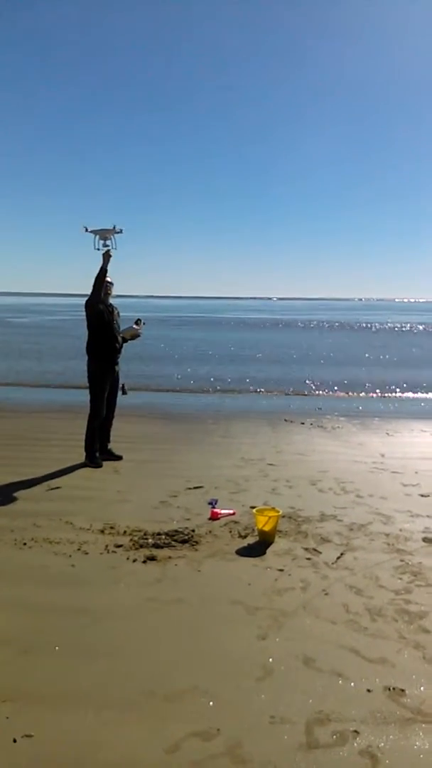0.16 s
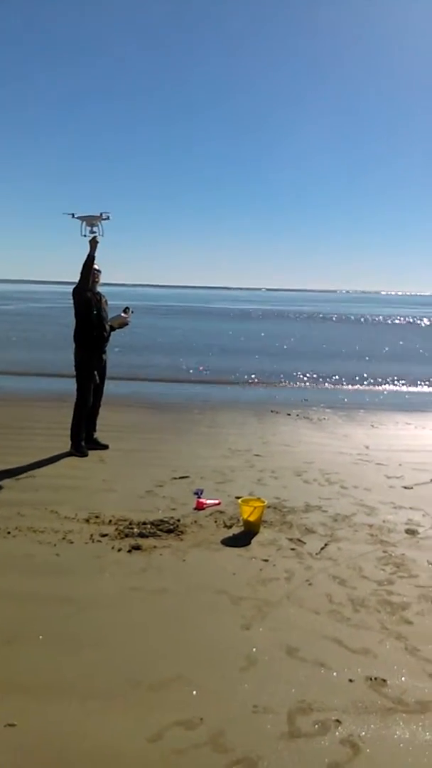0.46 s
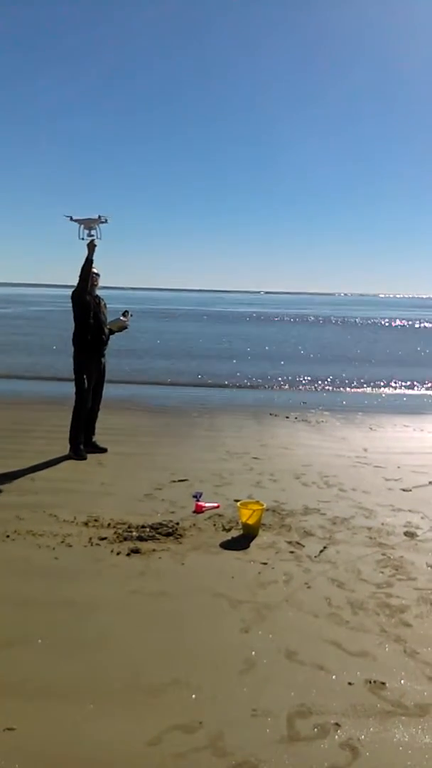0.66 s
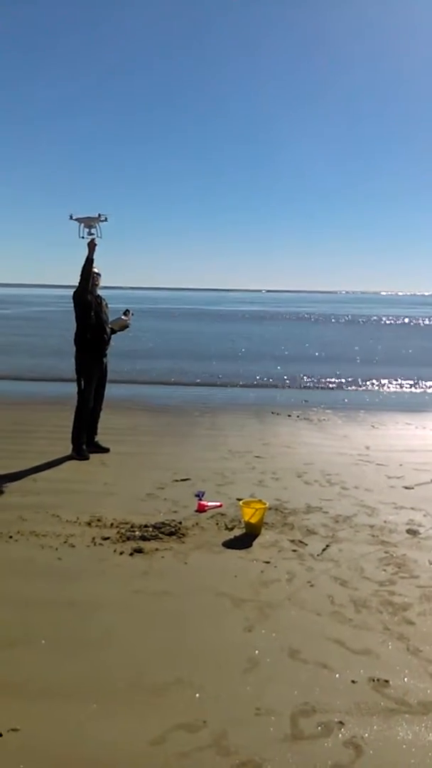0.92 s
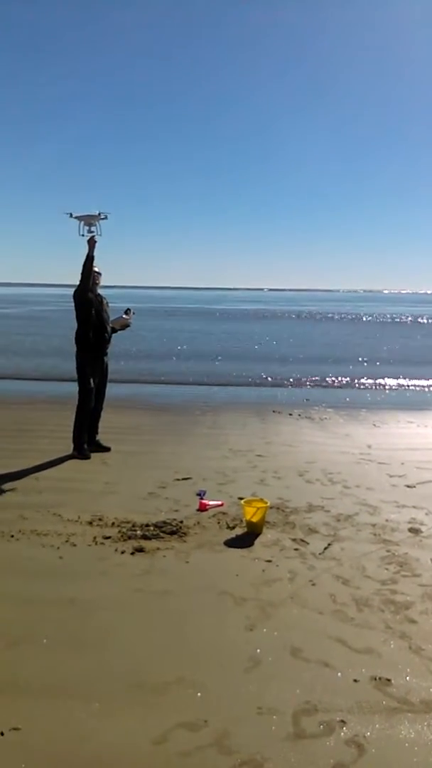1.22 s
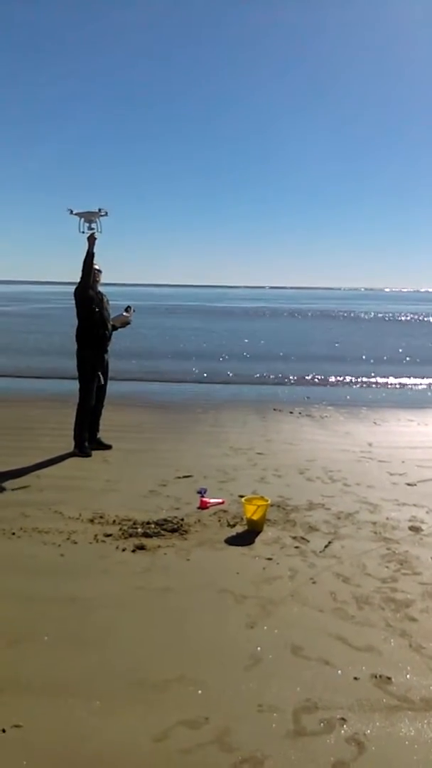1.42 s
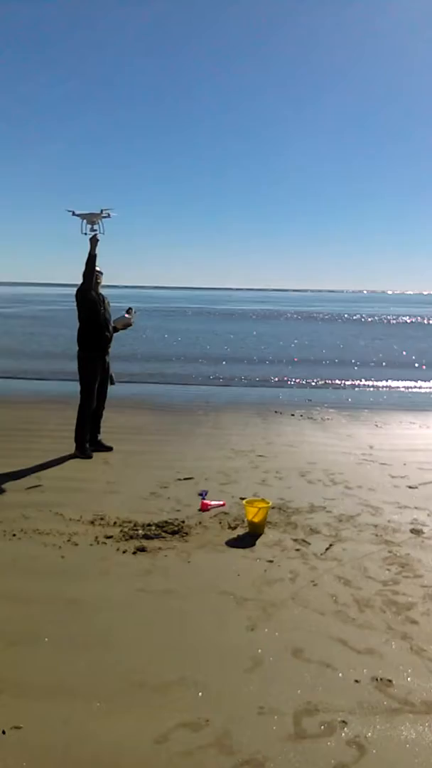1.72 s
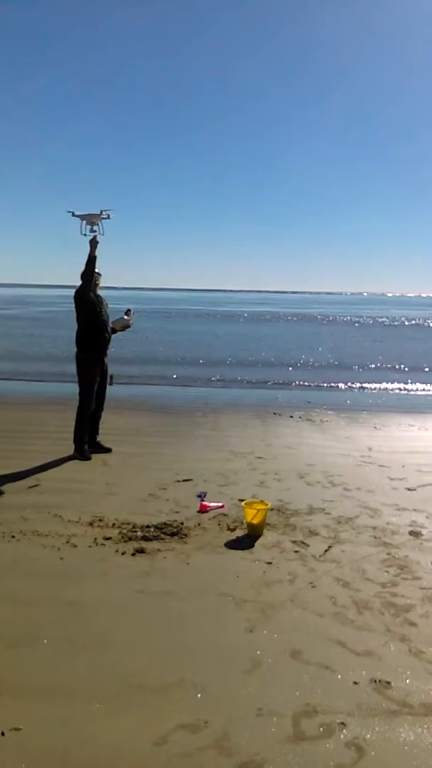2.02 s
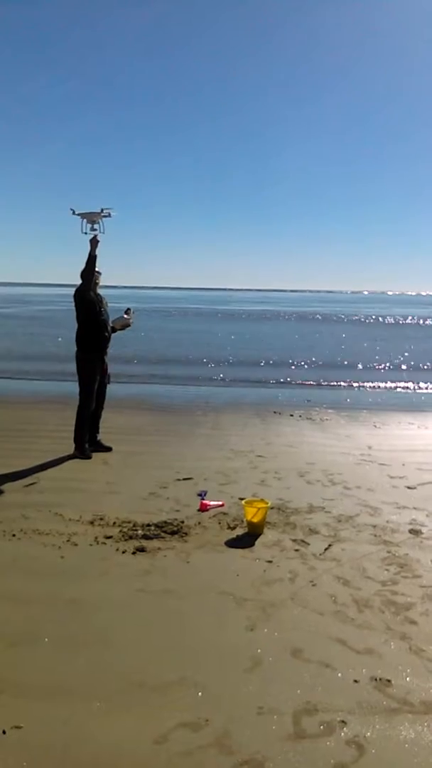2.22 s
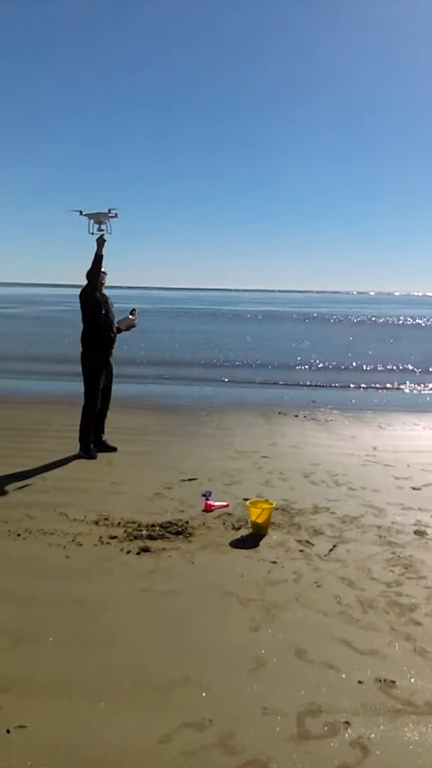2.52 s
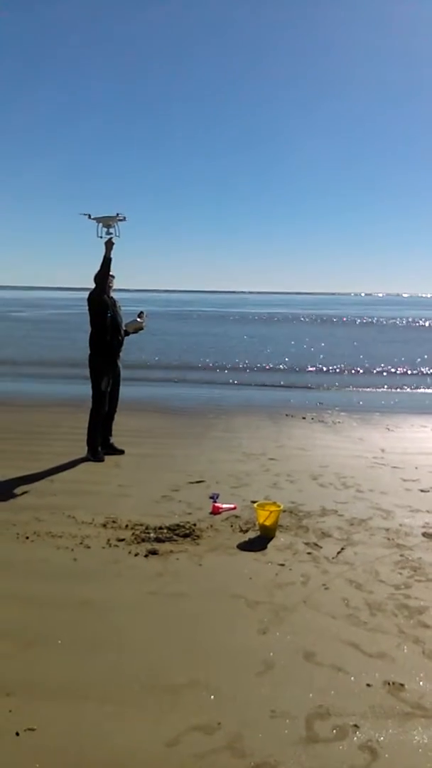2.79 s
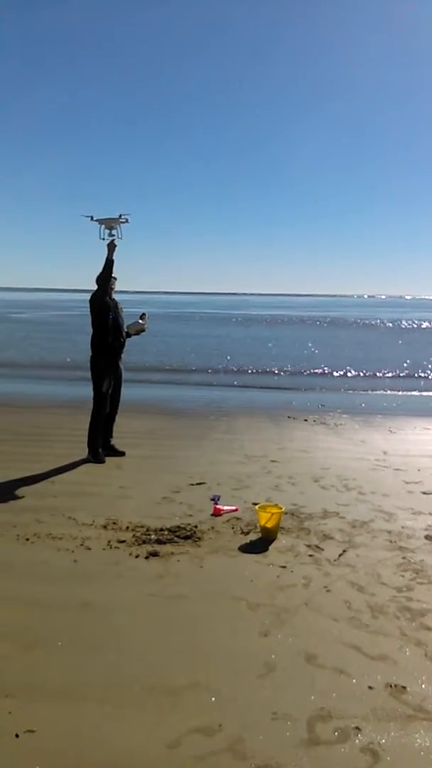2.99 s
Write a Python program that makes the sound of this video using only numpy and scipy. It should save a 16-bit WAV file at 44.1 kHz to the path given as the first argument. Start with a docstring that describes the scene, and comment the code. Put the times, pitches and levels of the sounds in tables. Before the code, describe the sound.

A small drone hovers a few metres away throughout, with a buzzing propeller hum and thin motor whine over a soft sea murmur. Wind rumbles and thumps on the left of the microphone from the start. Near 1.7 seconds it drops and the buzz wavers harder. Two buffets hit the right at 2.0 and 2.2 seconds, and wind is back on the left until about 3 seconds.

```python
"""On a beach, a small four-rotor drone hovers some metres from a stereo microphone. From the start each
rotor hums at its own blade rate, the motors whine and the blades hiss over the murmur of the sea, while
wind rumbles and thumps in the left port. Near 1.7 s the wind drops and the rotors waver harder as the
drone corrects. Two buffets hit the right port at 2.0 and 2.2 s; the wind is back on the left until 3 s."""
import sys
import numpy as np
from scipy import signal
from scipy.fft import rfft, irfft, next_fast_len
from scipy.io import wavfile
from scipy.ndimage import uniform_filter1d, map_coordinates

SR = 44100
rng = np.random.default_rng(int(sys.argv[2]) if len(sys.argv) > 2 else 0)


def wav_out(sig):
    """Save sig, one row per channel (or a flat mono array), as 16-bit PCM at SR to the path in sys.argv[1]."""
    wavfile.write(sys.argv[1], SR, np.round(np.clip(np.atleast_2d(sig).T, -1, 1) * 32767).astype(np.int16))


N = 138915


def amp(db):
    """Decibels to gain."""
    return 10 ** (np.asarray(db) / 20)


def unit(x):
    """Scale to rms 1."""
    return x / np.sqrt(np.mean(x ** 2) + 1e-20)


def along(points, hz):
    """Each value column of (frequency, value, ..) rows, interpolated at hz on a log axis."""
    freqs, *columns = np.transpose(points)
    return np.array([np.interp(np.log(hz + 1), np.log(freqs + 1), c) for c in columns])


def curves(rows):
    """Each value column of (time, value, ..) rows, interpolated at every sample."""
    times, *columns = np.transpose(rows)
    return [np.interp(np.arange(N) / SR, times, c) for c in columns]


def wobble(rate):
    """A smooth random curve with `rate` knots a second."""
    return map_coordinates(rng.standard_normal(int(N * rate / SR) + 4), [np.arange(N) * rate / SR])


def filtered(x, response):
    """Pass x through a complex response, given as a function of frequency."""
    size = next_fast_len(N + SR // 2)
    return irfft(rfft(x, size) * response(np.fft.rfftfreq(size, 1 / SR)), size)[..., :N]


def port_phase(hz):
    """Phase difference between the two microphone ports, half on each side."""
    # lead of the left port: (frequency [Hz], phase [rad])
    lead = [(0, 0), (1380, 0.7), (4130, 2), (4480, 1.07), (9820, -38), (10900, -38.5), (13100, -45.5),
            (15200, -65.5)]
    return np.exp(.5j * np.outer([1, -1], np.interp(hz, *np.transpose(lead))))


def sea_and_blade_hiss(level_db, patchy_db):
    """Sea and blades make a broad noise in faint patches, partly shared by the two ports."""
    # relative spectrum: (frequency [Hz], left [dB], right [dB])
    spectrum = [(25, -21, 1.5), (81, -9, -4), (185, -12, -9.5), (580, -14, -51), (1020, -15, -10),
                (1500, -16, -22), (2310, -15.5, -14.5), (3740, -22.5, -21.5), (4380, -22, -26.5),
                (6050, -13.5, -15), (5670, -23.5, -23.5), (7770, -18.5, -20.5), (8900, -21.5, -14.5),
                (11000, -25, -13), (12330, -26, -18.5), (15900, -36, -33)]
    # likeness of left and right: (frequency [Hz], shared power [0..1])
    likeness = [(300, 0.57), (1500, 0.56), (8000, 0.67), (13000, 0.17)]
    bins = signal.stft(rng.standard_normal((3, N)), nperseg=512)[2]
    patches = uniform_filter1d(rng.standard_normal(bins.shape[1:]), size=4, axis=0)
    patches = unit(uniform_filter1d(patches, size=8, axis=1))
    common, *own = signal.istft(bins * amp(patchy_db * patches), nperseg=512)[1][:, :N]
    share = lambda f: np.clip(along(likeness, f), 0, 1)
    both = filtered(common, lambda f: amp(along(spectrum, f)) * port_phase(f) * np.sqrt(share(f)))
    each = filtered(np.array(own), lambda f: amp(along(spectrum, f)) * np.sqrt(1 - share(f)))
    return amp(level_db) * unit(both + each)


def wind_rumble(flutter_db, flutter_growth, lumpy_db):
    """Turbulence rumbles in the left port; a flutter rides on its swings, growing faster than the wind."""
    # wind on the left port: (time [s], level [dB])
    wind = [(0, -30.5), (.25, -27), (.5, -25), (1, -25.5), (1.45, -27), (1.58, -32.5), (1.68, -41.5),
            (1.95, -41), (2.1, -28.5), (2.25, -30.5), (2.3, -21.5), (2.5, -27), (2.95, -28), (3.15, -38)]
    # relative spectra of rumble and flutter: (frequency [Hz], level [dB])
    rumble_spectrum = [(20, 0), (45, 4), (100, 2.5), (170, -8), (300, -22), (600, -58)]
    flutter_spectrum = [(60, -25), (200, 3.5), (350, -4), (600, -14.5), (1500, -43)]
    wind_db, = curves(wind)
    noise = lambda shape: unit(filtered(rng.standard_normal(N), lambda f: amp(along(shape, f)[0])))
    rumble = unit(amp(lumpy_db * wobble(24.32)) * noise(rumble_spectrum))
    swings = uniform_filter1d(abs(rumble), size=200)
    flutter = unit(swings * noise(flutter_spectrum))
    flutter *= amp(flutter_db + flutter_growth * (wind_db - wind_db.max()))
    return amp(wind_db) * (rumble + flutter) * [[1], [0]]


def wind_thumps(swing_cycles, suck_cycles, hard_db):
    """Each eddy is a short swing on one port; the hardest are a sudden suck, rebounding ever slower."""
    # eddies, a list for the left port and one for the right: (time [s], peak [dB], pitch [Hz])
    eddies = [
        [(0.115, -15.4, 146), (0.277, -20, 121), (0.326, -12.5, 209), (0.423, -13.5, 147), (0.471, -7.5, 163),
         (0.508, -16.5, 100), (0.53, -19, 183), (0.59, -14.5, 130), (0.695, -17, 200), (0.78, -14.5, 112),
         (0.884, -18.5, 173), (0.919, -11, 185), (1.091, -9, 143), (1.353, -13.5, 194), (1.423, -25.5, 92.5),
         (1.515, -20, 116), (1.6, -25, 112), (2.15, -21, 93), (2.296, -11, 97), (2.318, -13, 108),
         (2.337, -13, 131), (2.352, -15, 100), (2.424, -13.5, 84), (2.521, -15, 140), (2.755, -17, 127),
         (2.807, -15, 117), (2.937, -14.5, 129), (3.07, -21, 96)],
        [(2.004, -17.5, 131), (2.019, -16.5, 110), (2.173, -20, 100), (2.189, -15, 116), (2.204, -14, 95)],
    ]
    out = np.zeros((2, N))
    t = np.arange(-SR // 40, SR // 40) / SR
    for port, rows in zip(out, eddies):
        for time, peak_db, hz in rows:
            swing = np.exp(-(t * hz / swing_cycles) ** 2)
            swing *= np.cos(2 * np.pi * hz * t + rng.normal(2.53, 1.0))
            age = np.maximum(t * hz / suck_cycles + 1.163, 0)
            rebound = -np.sin(np.pi * age ** .62)  # a power below 1 slows the swings
            suck = rebound * np.tanh(4 * age) ** 2 * np.exp(-age / 2.6)
            hardness = min(amp(5 * (peak_db - hard_db)), 1)
            thump = (1 - hardness) * swing + 1.08 * hardness * suck
            port[round((time + t[0]) * SR):][:len(t)] += amp(peak_db) * thump / abs(thump).max()
    return out


def rotor_tone(blade_phase, multiple, trim_db, port_db, flicker_db=2.2):
    """One multiple of a blade rate at both ports, its level flickering."""
    gain = amp(trim_db + flicker_db * wobble(20))
    return np.outer(amp(port_db), gain * np.sin(round(multiple) * blade_phase + 2 * np.pi * rng.random()))


def narrow_peaks(hz):
    """Peaks lift nearby tones: the hum slightly near 1055 Hz, the high whine at the frame's resonances."""
    # peaks: (frequency [Hz], width [Hz], height of the added peak [dB])
    peaks = [(1055, 45, 2.5), (5372, 62, 25), (5630, 170, 6)]
    return 1 + sum(amp(db) / (1 + (2 * (hz - centre) / width) ** 2) for centre, width, db in peaks)


def rotors(hunt_hz, drift_hz, torque_db_per_hz):
    """Four rotors hum and their motors whine; their speed hunts up and down as the drone corrects."""
    # the hover: (time [s], blade rate of rotors 1, 2, 3, 4 [Hz], hunting depth [Hz])
    hover = [(0, 162.9, 165.5, 168.5, 172.4, 2.4), (.3, 154.9, 165.5, 169.3, 175.5, 1.1),
             (.5, 158.7, 164.6, 168, 176.3, 1.5), (.65, 161, 167.5, 169, 173.2, 2),
             (.8, 157, 166.2, 171, 173.4, 1.4), (1, 155.4, 167.4, 171, 173.3, 1.1),
             (1.17, 156, 166.9, 169.5, 172, 1.1), (1.37, 153.3, 169.1, 170.5, 176.5, 1),
             (1.48, 153.9, 167.8, 171.3, 176, .8), (1.59, 155.9, 167, 171.8, 175.4, .9),
             (1.74, 153.3, 168.3, 169, 175.5, 1.2), (1.79, 159.5, 161.5, 167, 179, 4),
             (2.1, 159.5, 164.2, 167.5, 175.1, 3), (2.25, 156.4, 167, 170, 175.4, 1.7),
             (2.45, 158.5, 165.8, 168, 174.3, 1.4), (2.72, 156.4, 165.5, 169.8, 175.7, .9),
             (2.85, 158.3, 163.5, 167.9, 172.9, 4), (3.15, 156, 166, 171.5, 175.1, 3)]
    # each rotor's part in the hunting: (share [0..1], depth ignored [Hz], phase [turns])
    hunting = [(1, .6, .75), (1, 0, 0), (.6, 1, .5), (1, .6, .25)]
    # hum at multiples 1, 2, 3 .. of the blade rate: (left [dB], right [dB])
    hum = [(-64, -59.5), (-49, -50.5), (-54.5, -61), (-64.5, -53.5), (-67, -58.5), (-67, -70), (-60, -62),
           (-76.5, -68), (-101, -81), (-71.5, -91), (-64, -70.5)]
    # low and high motor whine: (multiple of the blade rate, left [dB], right [dB])
    whine = [(21, -58, -64), (35, -73, -77.5)]
    # each rotor's trim: (even multiples [dB], odd multiples [dB], low whine [dB], high whine [dB])
    trims = [(-9.5, 1, -6.5, 4.5), (3.5, -1, 3.5, 18), (-4, -3, -3, -17), (-0.5, -13.5, -0.5, -12)]
    # swell of the high whine: (time [s], gain [dB])
    swell = [(0, -8), (.9, 0), (1.42, 3.5), (1.85, -5), (3.15, -5)]
    *rates, hunt_depth = curves(hover)
    swell_db, = curves(swell)
    out = np.zeros((2, N))
    t = np.arange(N) / SR
    for rate, (share, slack, offset), (even_db, odd_db, low_db, high_db) in zip(rates, hunting, trims):
        rate = uniform_filter1d(rate, size=1200) + drift_hz * wobble(35)
        depth = share * np.maximum(hunt_depth - slack, 0)
        hunt_phase = 2 * np.pi * (hunt_hz * (t - 1.89) + offset + .2 * wobble(4))
        blade_phase = 2 * np.pi * np.cumsum(rate + depth * np.sin(hunt_phase)) / SR
        for multiple, port_db in enumerate(hum, start=1):
            out += rotor_tone(blade_phase, multiple, odd_db if multiple % 2 else even_db, port_db)
        torque_db = torque_db_per_hz * depth * np.cos(hunt_phase)  # more whine while the motor speeds up
        for (multiple, *port_db), trim_db in zip(whine, [low_db, high_db + swell_db]):
            out += rotor_tone(blade_phase, multiple, trim_db + torque_db, port_db)
    return np.sqrt(2) * filtered(out, lambda f: narrow_peaks(f) * port_phase(f))


def scene():
    """Drone, sea and wind as they reach the two microphone ports."""
    return (rotors(hunt_hz=12.6, drift_hz=.36, torque_db_per_hz=1.1)
            + sea_and_blade_hiss(level_db=-44.5, patchy_db=1.65)
            + wind_rumble(flutter_db=-9, flutter_growth=.56, lumpy_db=1.5)
            + wind_thumps(swing_cycles=.5, suck_cycles=.3, hard_db=-7.5))


def record(dry):
    """The microphone drops the deepest bass, rounds the strongest peaks and cuts the highest treble."""
    low_cut_hz, ceiling, top_hz = 38, .42, 15714
    thinned = filtered(dry, lambda f: (1j * f / (low_cut_hz + 1j * f)) ** 2)
    rounded = ceiling * np.tanh(thinned / ceiling)
    return filtered(rounded, lambda f: f < top_hz)


dry = scene()
out = record(dry)
wav_out(out)
```